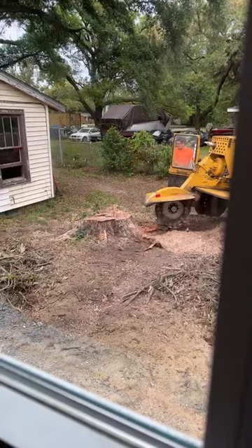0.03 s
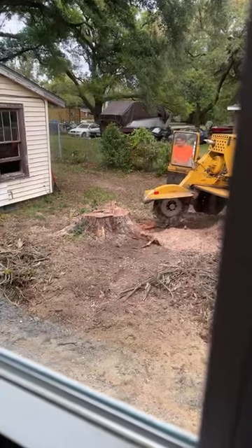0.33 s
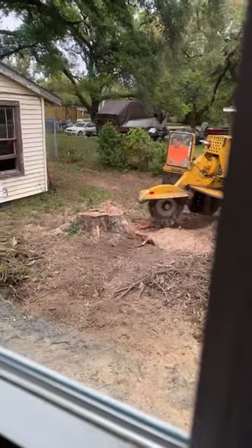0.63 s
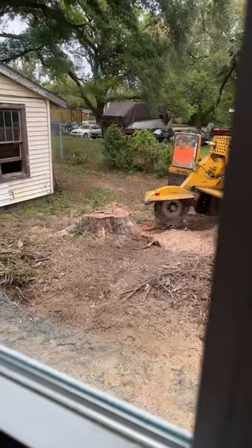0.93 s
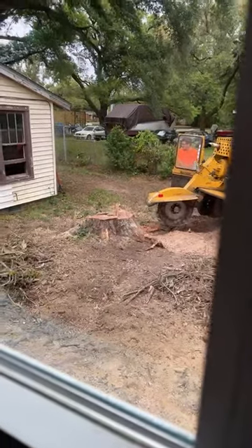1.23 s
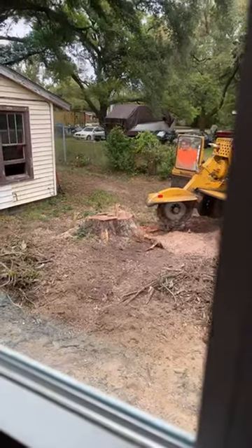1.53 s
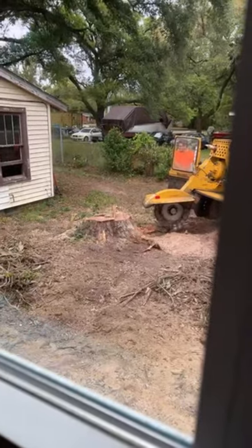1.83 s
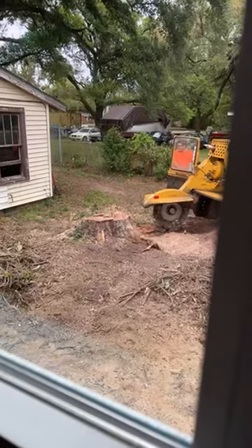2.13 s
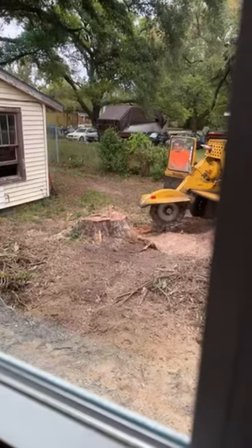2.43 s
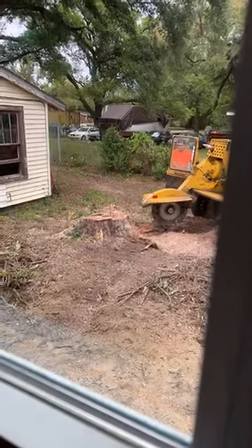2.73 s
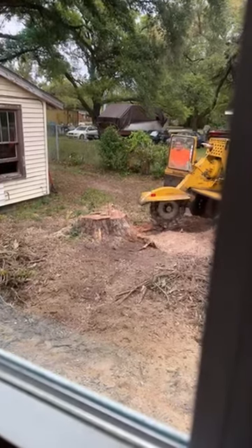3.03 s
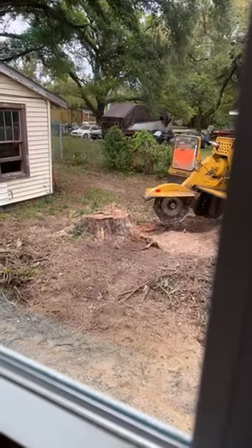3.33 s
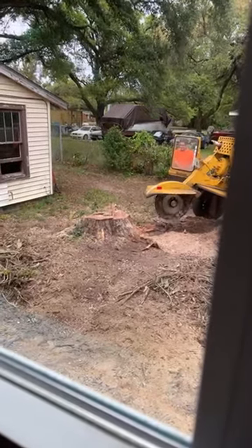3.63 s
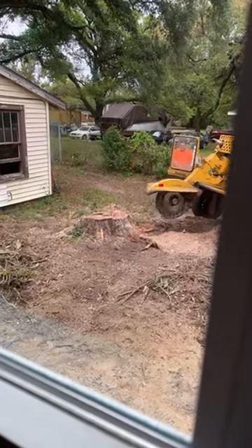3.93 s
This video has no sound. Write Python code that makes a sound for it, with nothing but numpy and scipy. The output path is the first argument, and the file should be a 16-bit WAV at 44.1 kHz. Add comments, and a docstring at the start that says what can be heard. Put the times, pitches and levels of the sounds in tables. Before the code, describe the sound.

A stump grinder's engine drones and clatters steadily across a yard, cutting out once briefly.

```python
"""The hum and clatter of a stump grinder at governed speed, heard across a yard from a window.
Its four-cylinder engine hums at the firing rate, its clatter partly repeats each cycle, and pump and
gears whine. A second shaft drones against it, a tone growls, and uneven knocks rumble in the steel
body, with light rings, thin hiss and faint squeaks on top. Late on it takes up load and the balance
of its whines shifts. The sound fades in fast and cuts out once."""
import sys
import numpy as np
from scipy import signal
from scipy.fft import rfft, irfft
from scipy.io import wavfile
from scipy.ndimage import uniform_filter1d, map_coordinates

SR = 44100
rng = np.random.default_rng(int(sys.argv[2]) if len(sys.argv) > 2 else 0)


def wrap_up_sound(samples):
    """Save the sound to the file named by the first command line argument, as 16-bit audio."""
    columns = np.atleast_2d(samples).T
    # keep every value between -1 and 1, then stretch to whole-number steps
    tamed = np.clip(columns, -1, 1)
    steps = np.round(tamed * 32767).astype(np.int16)
    wavfile.write(sys.argv[1], SR, steps)


N = 176400

CYCLE_HZ = 22.74  # one engine cycle is two crank turns
LOAD_START_S, LOAD_RISE_S, LOAD_SAG = 2.95, .261, .003  # sag: share of engine speed lost under load
# slow swells in the mix: time_s, hum_gain_db, drone_gain_db, body_gain_db
SWELLS = [(.1, -1, 8, 1.5), (.4, -3.2, 3, 0), (.65, 0.5, 1, 1), (.9, -0.5, 6, 0.2), (1.2, -0.7, 0.5, 0.5),
          (1.55, 1.8, -1, 0.3), (1.8, -2.5, 1, 0.5), (2.05, 1, 0, -0.5), (2.3, 0.5, 2.5, -0.5),
          (2.55, 0.5, -1, 0), (2.8, 0.5, 4.5, -0.9), (3.0, -0.5, 5, -0.5), (3.2, -2, 2.5, 0.5),
          (3.4, -2, -10, -1), (3.6, -2.3, -8, 1.2), (3.9, -3, 2.5, -0.5)]


def undb(db):
    """Decibels to gain."""
    return 10 ** (np.asarray(db) / 20)


def level(x, db):
    """Set the rms level."""
    return x * undb(db) / np.sqrt(np.mean(x ** 2))


def curve(t, points, column=1):
    """Follow one column of a table whose rows start with a time."""
    columns = np.array(points).T
    return np.interp(t, columns[0], columns[column])


def swell(t, peak_s, half_s):
    """A bell-shaped rise and fall."""
    return np.exp(-((t - peak_s) / half_s) ** 2)


def walk(rate_hz):
    """Smooth random drift with a spread of about 1."""
    hz = np.arange(N + 1) * SR / (2 * N)
    spectrum = rfft(rng.standard_normal(2 * N)) * np.exp(-(hz / rate_hz) ** 2)
    return level(irfft(spectrum), 0)[:N]


def colour(x, points):
    """Equalise along (frequency_hz, gain_db) points."""
    hz, db = np.array(points, float).T
    bins_hz = np.maximum(np.arange(N // 2 + 1) * SR / N, 1)
    return irfft(rfft(x) * undb(np.interp(np.log(bins_hz), np.log(hz), db)), N)


def ring(hz, width_hz):
    """Noise through a resonance, twice for steep skirts."""
    b, a = signal.iirpeak(hz, hz / (1.5 * width_hz), fs=SR)
    return signal.lfilter(b, a, signal.lfilter(b, a, rng.standard_normal(N)))


def load():
    """Load on the machine, rising from 0 to 1."""
    return np.clip((np.arange(N) / SR - LOAD_START_S) / LOAD_RISE_S, 0, 1)


def loaded(x, free_db, load_db):
    """Move a sound from its free-running level to its level under load."""
    return level(x, 0) * undb(free_db + (load_db - free_db) * load())


def turns(hz, wander):
    """Running count of turns at a speed that drifts by the share `wander`."""
    return np.cumsum(hz * (1 + wander * walk(2.98))) / SR


def tones(phase, partials, waver_hz):
    """Tones locked to a rotation, each wavering in level."""
    mix = np.zeros(N)
    for multiple, free_db, load_db, waver_db in partials:
        tone = np.sin(2 * np.pi * (multiple * phase + rng.random()))
        mix += loaded(tone * undb(waver_db * walk(waver_hz)), free_db, load_db)
    return mix


def engine_hum(t, cycle):
    """Four firings a cycle make the fourth harmonic the strongest."""
    # engine harmonics: cycle_multiple, free_db, load_db, waver_db
    harmonics = [(3, -52.5, -56, 4), (4, -38, -36.5, 0.56), (8, -55.5, -65, 3.5), (16, -55.5, -48.5, 0.5),
                 (18, -53, -48.5, 0.5)]
    return undb(curve(t, SWELLS, column=1)) * tones(cycle, harmonics, waver_hz=10)


def pump_and_gears(cycle):
    """Pump and gears whine and flutter, locked to the engine."""
    # whines: cycle_multiple, free_db, load_db
    whines = [(42, -64, -65), (54, -68, -61), (58, -73, -60), (66, -64, -67), (70, -65, -67),
              (72, -72, -64), (84, -68, -56.5), (98, -68, -64), (126, -60.5, -72), (127, -65.5, -74),
              (204, -80, -73), (368, -86, -79), (567, -104, -93)]
    flutter_db = 2
    return tones(cycle, [(*row, flutter_db) for row in whines], waver_hz=22)


def clatter(cycle):
    """Valves, injectors and gears: bursts of noise that partly repeat with each engine cycle."""
    # tone colour of the clatter: frequency_hz, gain_db
    spectrum = [(300, -17), (500, 0.5), (800, -2.5), (1250, -1), (1800, -3), (2300, -4.5), (2700, -9.5),
                (3250, -13), (3700, -16), (4200, -16.5), (4700, -17.5), (5600, -18.5), (6600, -23),
                (7850, -29.5), (8300, -25.5), (10400, -30.5), (11400, -36.5)]
    # its top octave: frequency_hz, gain_db
    top = [(12300, -50), (13500, -55), (15500, -59)]
    size = 1941  # about one cycle, in samples

    def recur(pattern, fresh, share):
        """Loop a pattern once a cycle for this share of the power; the rest is new."""
        looped = map_coordinates(pattern, [(cycle % 1) * size], order=3, mode="grid-wrap")
        return np.sqrt(share) * level(looped, 0) + np.sqrt(1 - share) * fresh

    noise = recur(rng.standard_normal(size), rng.standard_normal(N), share=.25)
    burst_pattern = uniform_filter1d(rng.standard_normal(size), size=60, mode="wrap")
    bursts_db = 1.2 * recur(burst_pattern, walk(300), share=.45)
    flutter_db = .74 * walk(30)
    rattle = window_frame(noise * undb(bursts_db + flutter_db))
    return level(colour(rattle, spectrum + top), db=-44.5)


def window_frame(x, count=9, span_s=.014, echo_db=-10.5):
    """Short reflections from the window frame ripple the spectrum."""
    lags = (rng.uniform(.0981, 1, size=count) * span_s * SR).astype(int)
    echoes = sum((-1) ** k * np.roll(x, lag) for k, lag in enumerate(lags))
    return x + undb(echo_db) * echoes / np.sqrt(count)


def growl(t, speed):
    """A firm growling tone surges and ebbs, its pitch sagging with the engine."""
    # surges: time_s, gain_db
    surges = [(.2, 3), (.5, -5), (.75, 1), (1.1, -5), (1.7, 3), (2.0, -4), (2.3, 4), (2.6, -5), (3.25, -3),
              (3.55, 5), (3.9, -2)]
    pitch_hz, free_db, load_db, waver_db = 359, -48, -46.5, 2
    phase = turns(pitch_hz * speed, wander=.004)
    return undb(curve(t, surges)) * tones(phase, [(1, free_db, load_db, waver_db)], waver_hz=6.7)


def second_shaft(t):
    """A shaft at its own speed gives a low drone and a whine that builds, then collapses."""
    # shaft speed: time_s, turns_per_s
    speed = [(.06, 108.9), (.5, 108.75), (.8, 108.3), (1.05, 108.75), (3.15, 108.75), (3.75, 108.25)]
    # low drone: shaft_multiple, free_db, load_db, waver_db
    drone_tones = [(1, -49.5, -47, 2.5), (3, -51.5, -45.3, 3)]
    # whine: shaft_multiple, free_db, load_db, waver_db
    whine_tones = [(5, -44.7, -44.6, .8), (10, -61.5, -64, 2.2)]
    # rise and fall of the whine: time_s, gain_db
    whine_swell = [(.1, 1.5), (.7, 0), (1.15, -2), (1.6, .5), (2.2, -.8), (2.7, 1.7), (3.2, 2.3),
                   (3.55, .5), (3.8, .5), (3.86, -11)]
    spin = turns(curve(t, speed), wander=.0007)
    drone = undb(curve(t, SWELLS, column=2)) * tones(spin, drone_tones, waver_hz=13)
    whine = undb(curve(t, whine_swell)) * tones(spin, whine_tones, waver_hz=7.4)
    return drone + whine


def steel_body(t, knocks_per_s=600, spread_db=2.2, smear_s=.01184):
    """Dense uneven knocks shake the steel body: a broad rumble, with narrow rings above it."""
    # tone colour of the rumble: frequency_hz, gain_db
    spectrum = [(20, -29), (45, -18), (64, -10.5), (80, -3.5), (110, 2), (170, 1.5), (230, -1.5), (305, 4),
                (400, -2.5), (520, -1.5), (620, -14.5), (900, -19), (2000, -58)]
    # body resonances: pitch_hz, width_hz, free_db, load_db
    resonances = [(158, 21, -53.5, -50.5), (195.5, 11.6, -50.5, -53.5), (320.5, 33, -50, -48.5),
                  (367.7, 25, -49.5, -52), (693.4, 20, -64.5, -56.5), (1235, 79, -56.5, -72),
                  (3210, 100, -67, -68.5), (4660, 210, -66, -70), (5010, 100, -71.5, -69.5),
                  (5600, 190, -70.5, -71), (8370, 88, -78.5, -75), (9040, 110, -78, -79),
                  (9500, 79, -83, -84)]
    knocks = (rng.random(N) < knocks_per_s / SR) * np.sign(rng.standard_normal(N))
    knocks *= undb(spread_db * rng.standard_normal(N))
    smear = rng.standard_normal(N) * np.exp(-t / smear_s)
    shake = irfft(rfft(knocks) * np.exp(1j * np.angle(rfft(smear))), N)  # blurs without colouring
    body = level(colour(shake, spectrum), db=-38.5)
    for hz, width_hz, free_db, load_db in resonances:
        waver_db = 2.5 if hz > 3000 else 0  # the high rings swell and fade
        body += loaded(ring(hz, width_hz) * undb(waver_db * walk(5)), free_db, load_db)
    return undb(curve(t, SWELLS, column=3)) * body


def steel_ringing(t):
    """Steel rings lightly now and then, and dies away."""
    # bright rings: peak_s, half_length_s, pitch_hz, width_hz, level_db
    rings = [(.08, .05, 5050, 160, -63), (.08, .08, 5660, 130, -67), (.3, .3, 4620, 150, -68),
             (.43, .12, 4990, 140, -61.5), (.63, .1, 5000, 120, -64), (2.15, .17, 4740, 130, -63.5),
             (3.05, .27, 4620, 130, -65), (3.2, .07, 5030, 140, -65.5)]
    return sum(swell(t, peak_s, half_s) * level(ring(hz, width_hz), db)
               for peak_s, half_s, hz, width_hz, db in rings)


def hiss(t):
    """A thin, very high hiss swells and fades a few times."""
    # tone colour of the hiss: frequency_hz, gain_db
    spectrum = [(7000, -20), (10500, -3), (12800, 0), (14500, -2), (16000, -5)]
    # puffs of hiss: peak_s, half_length_s, level_db
    puffs = [(1.13, .08, -77.5), (1.92, .11, -68.5), (2.04, .15, -64.5), (2.24, .14, -74)]
    return sum(swell(t, peak_s, half_s) * level(colour(rng.standard_normal(N), spectrum), db)
               for peak_s, half_s, db in puffs)


def squeaks(t, rasp_hz=130):
    """Faint, very high, raspy squeaks arch up and down in pitch."""
    # squeaks: peak_s, half_length_s, top_pitch_hz, droop_hz, level_db
    arches = [(1.36, .03, 13400, 250, -83), (1.525, .06, 14750, 1600, -79), (2.13, .08, 14150, 450, -76)]
    mix = np.zeros(N)
    for peak_s, half_s, top_hz, droop_hz, db in arches:
        droop = np.minimum(((t - peak_s) / half_s) ** 2, 10)
        hz = top_hz - droop_hz * droop + rasp_hz * walk(310)
        mix += undb(db) * swell(t, peak_s, half_s) * np.sin(2 * np.pi * np.cumsum(hz) / SR)
    return mix


def scene():
    """The whole grinder in mono; its engine slows a touch under load."""
    t = np.arange(N) / SR
    speed = 1 - LOAD_SAG * load()
    cycle = turns(CYCLE_HZ * speed, wander=.0007)
    engine = engine_hum(t, cycle) + pump_and_gears(cycle) + clatter(cycle)
    machine = engine + growl(t, speed) + second_shaft(t) + steel_body(t)
    return (machine + steel_ringing(t) + hiss(t) + squeaks(t))[None]


def record(dry):
    """The sound fades in fast, cuts out for a tenth of a second, and has its very top rolled off."""
    t = np.arange(N) / SR
    fade_start_s, fade_end_s = .036, .052
    gap_start_s, gap_end_s = 1.3875, 1.492
    top_hz = 15700
    fade_in = np.interp(t, (fade_start_s, fade_end_s), (0, 1))
    gate = uniform_filter1d(1. * ((t < gap_start_s) | (t > gap_end_s)), size=24)
    lowpass = signal.ellip(10, .1, 80, top_hz, fs=SR, output="sos")
    return signal.sosfilt(lowpass, dry * fade_in * gate)


dry = scene()
out = record(dry)
wrap_up_sound(out)
```